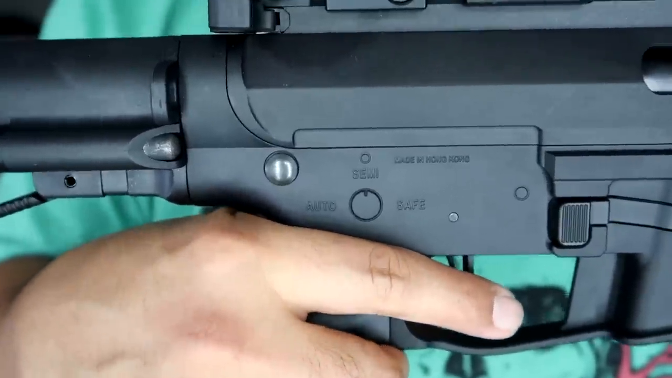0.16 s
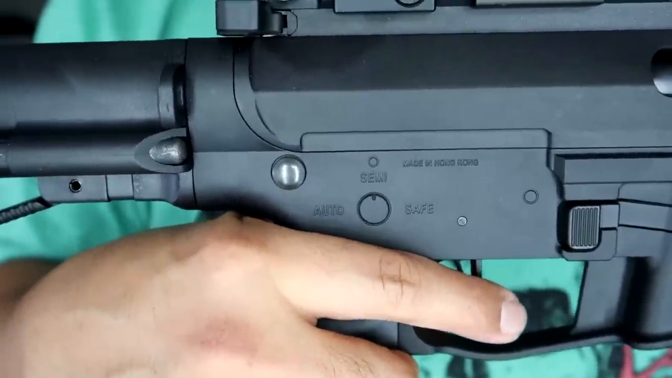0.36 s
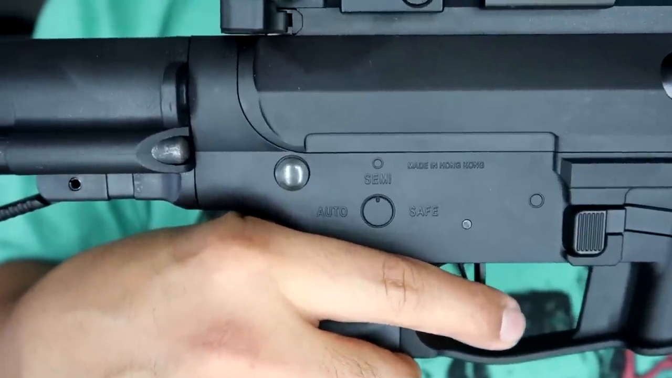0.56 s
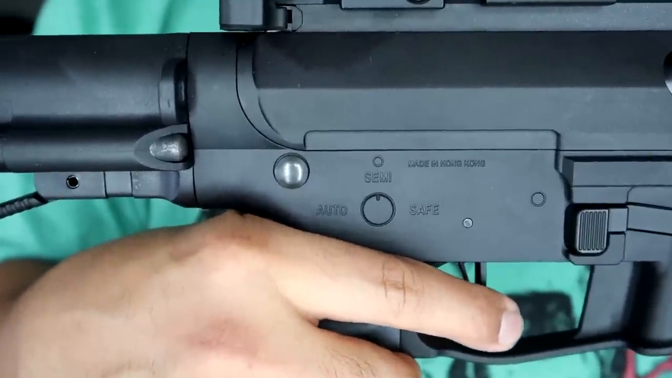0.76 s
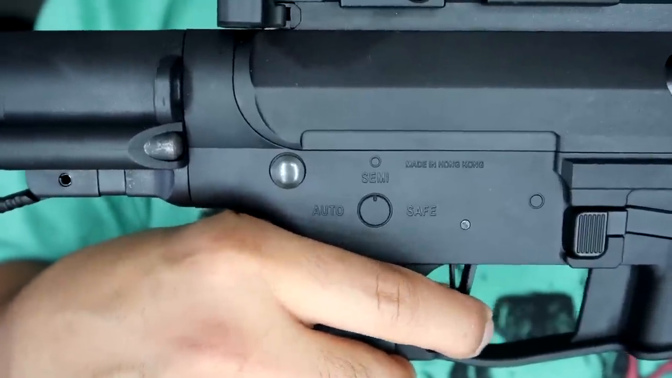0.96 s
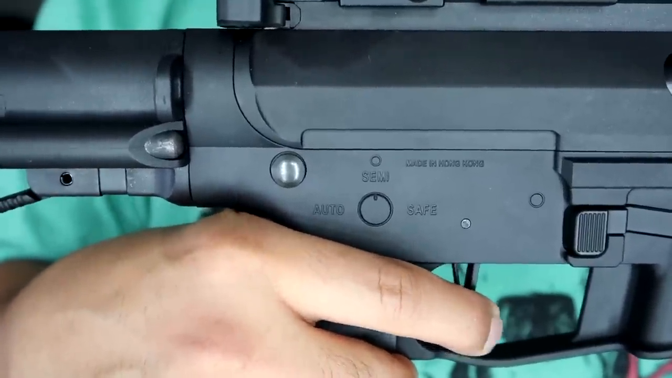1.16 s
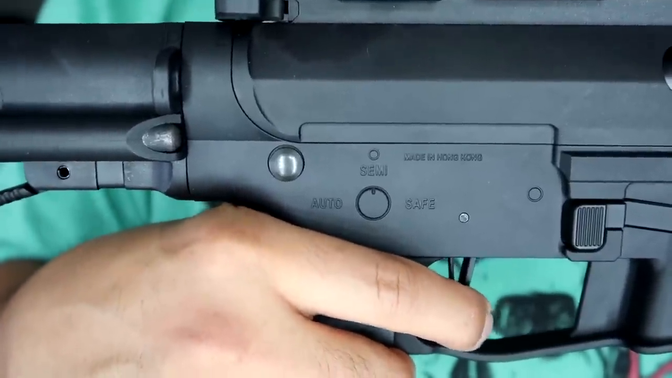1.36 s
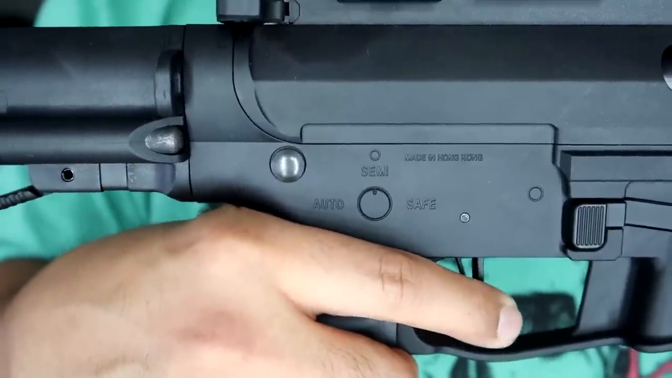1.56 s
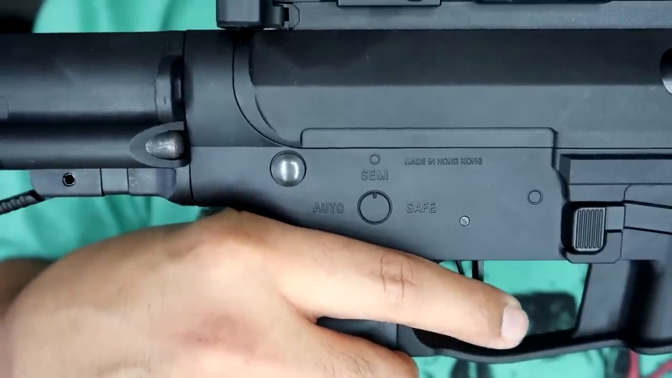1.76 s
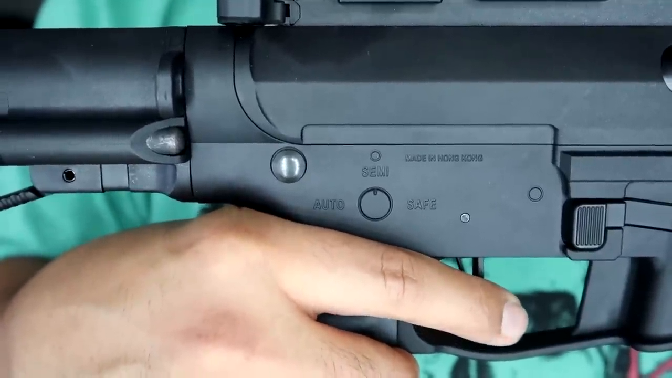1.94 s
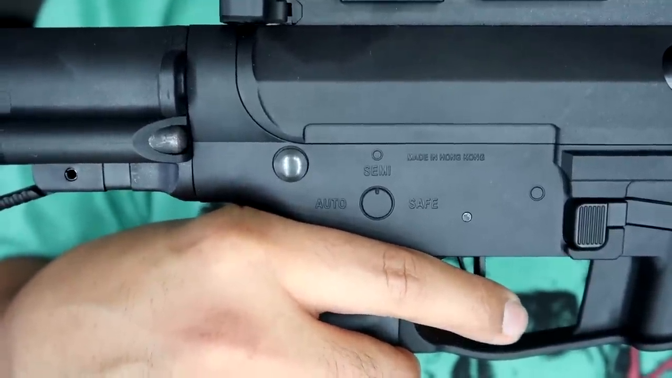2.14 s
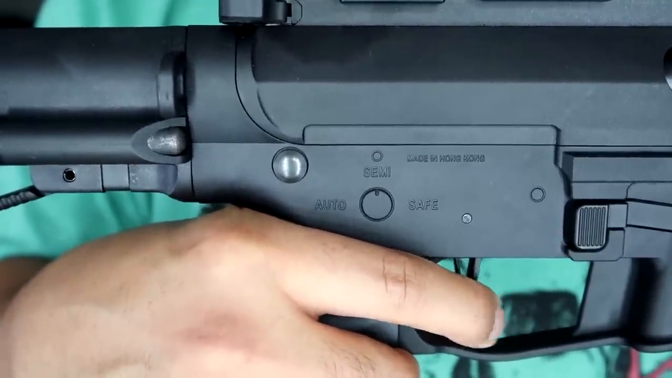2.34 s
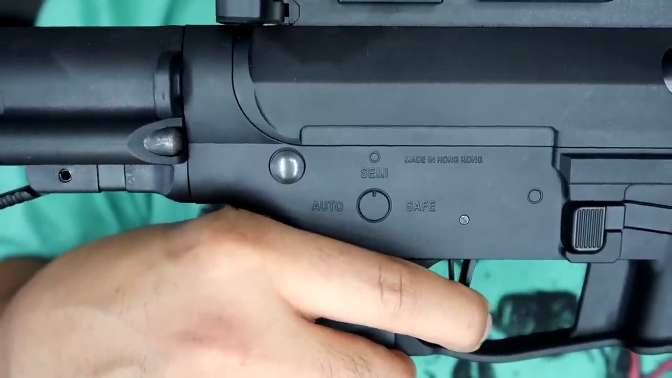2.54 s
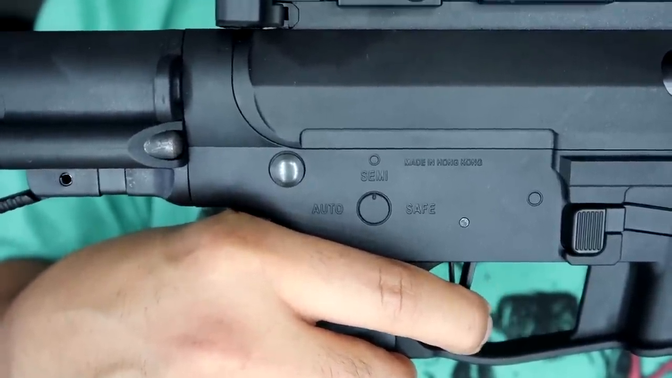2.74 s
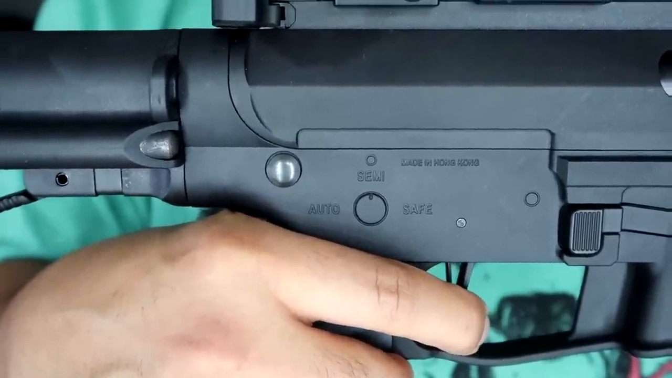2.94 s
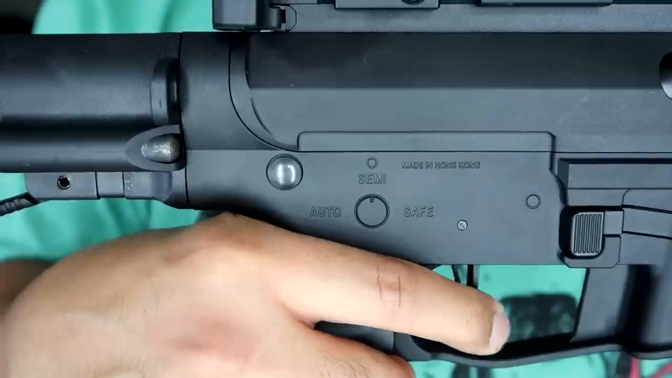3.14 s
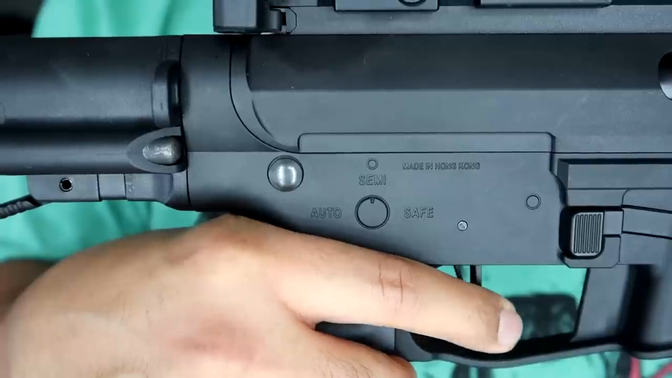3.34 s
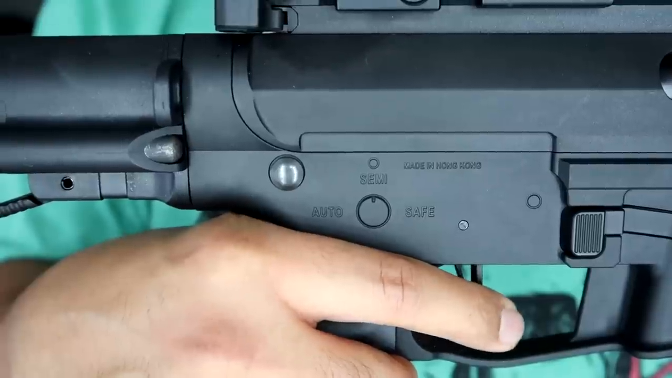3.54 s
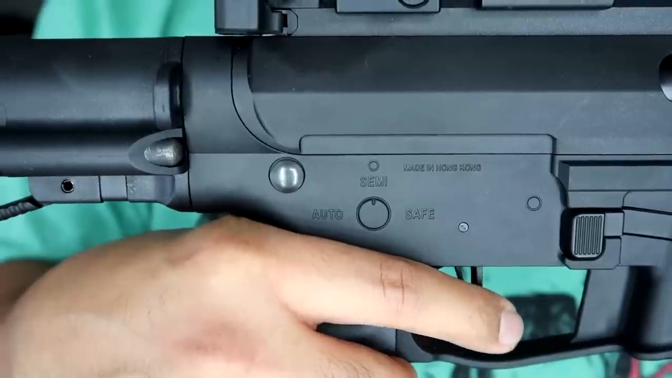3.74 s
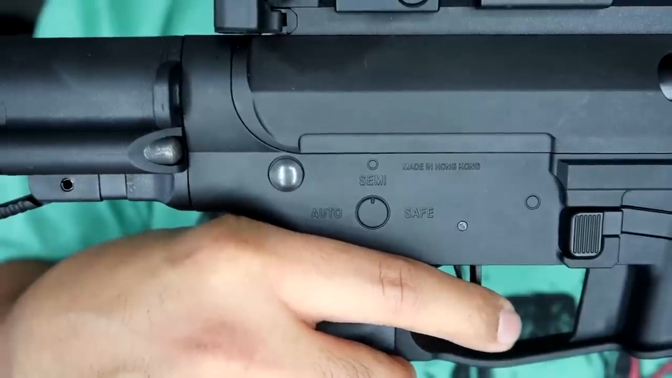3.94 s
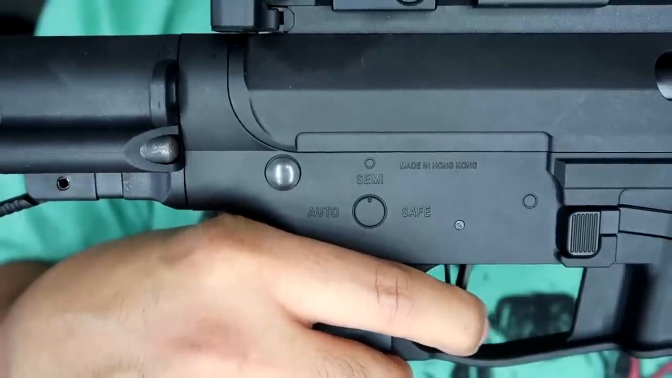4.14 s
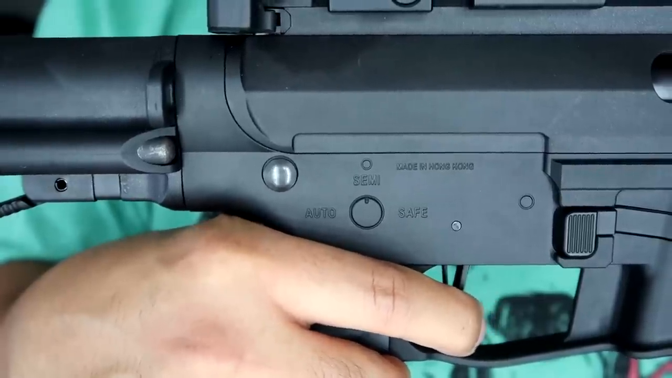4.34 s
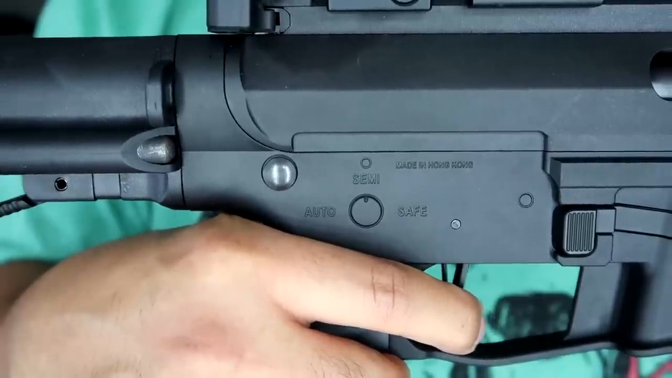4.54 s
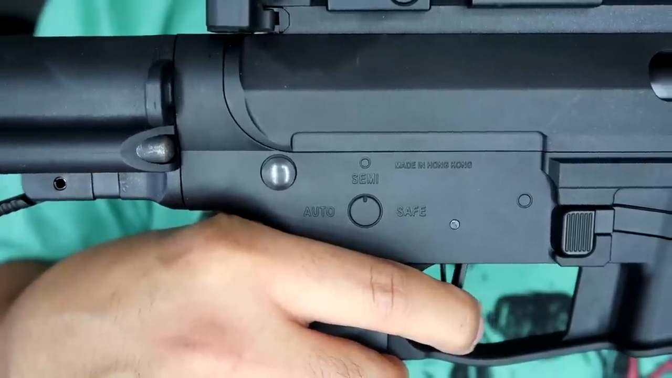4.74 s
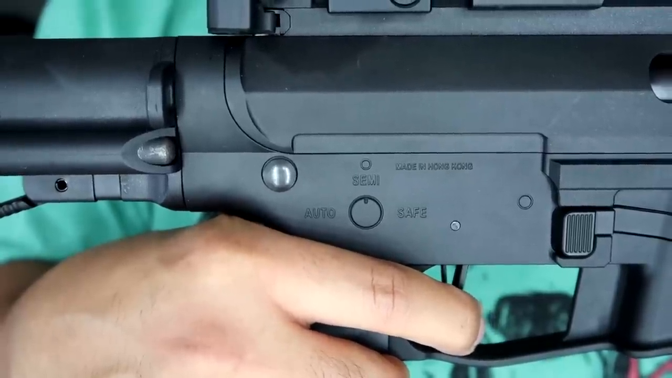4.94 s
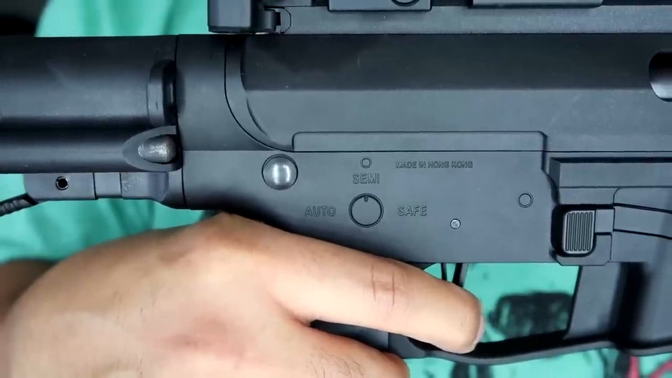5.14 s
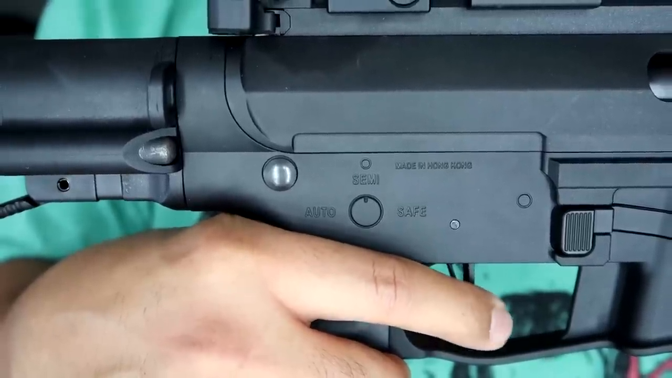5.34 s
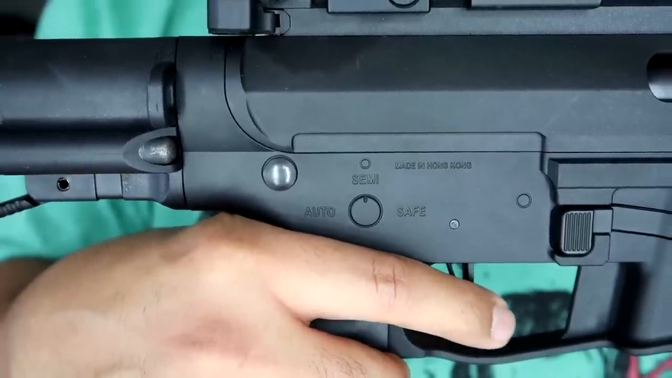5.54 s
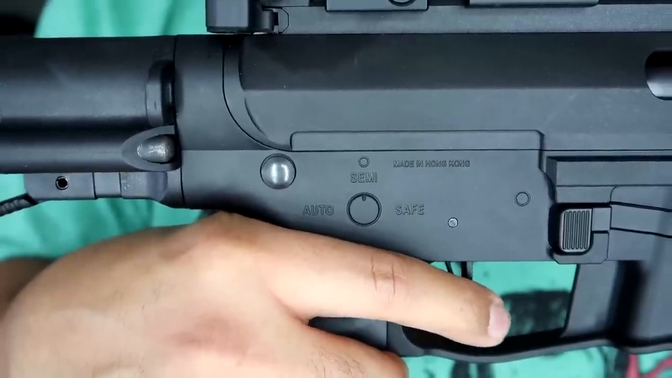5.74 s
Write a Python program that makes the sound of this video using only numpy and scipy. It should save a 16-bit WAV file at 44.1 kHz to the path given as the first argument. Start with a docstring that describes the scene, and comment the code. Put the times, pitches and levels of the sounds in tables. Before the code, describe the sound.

A small room is quiet at first, with a low wavering hum, soft rumble and hiss. At about 0.94 seconds a faint trigger tick leads straight into an electric airsoft gun's cycle, very close: a motor kick, a gritty gear whine rising for under a tenth of a second, then a hard, loud slam at 1.03. The body clacks, loose parts shiver, and a spring rings and buzzes metallically with a rapid flutter, fading over about a second. The trigger clicks back near 1.57. A second shot comes at 2.5, its spring slightly softer, with return clicks around 3.2. The third lands at 4.25 and rings a little longer, with the last clicks near 5.3. Short room echoes surround each slam. The automatic recording level drops at every shot and slowly recovers, so the hum and hiss swell back in between and at the end.

```python
"""A wavering hum, rumble and hiss fill a small room; a trigger ticks, and an electric airsoft gun fires
three single shots close by. Each time a faint hiss swells for milliseconds, the motor kicks in, and sine
whine and noise grind rise with gear speed until the piston is let go. Its slam rings the body's modes,
recoils and shivers loose parts; the spring, noise-driven resonances, rings and buzzes about a second; the
trigger clicks back. Echoes are decaying noise. The recorder's gain drops at every shot, slowly recovers."""
import sys
import numpy as np
from scipy import signal
from scipy.fft import rfft, irfft, next_fast_len
from scipy.io import wavfile
from scipy.ndimage import uniform_filter1d

SR = 44100
rng = np.random.default_rng(int(sys.argv[2]) if len(sys.argv) > 2 else 0)


def int16_out(signal):
    """Quantize to a 16-bit WAV file."""
    q = np.round(np.clip(np.atleast_2d(signal).T, -1, 1) * 32767)
    wavfile.write(sys.argv[1], SR, q.astype(np.int16))


N = 255383
TIME = np.arange(N) / SR

# room noise spectrum: (frequency [Hz], density [dB per Hz])
AIR = [(20, -4.5), (50, -2.5), (100, -2.5), (180, -6.5), (280, -3), (420, -10.5), (600, -11), (900, -13.5),
       (2000, -16), (4000, -22), (8000, -29.5), (15000, -40)]
# room noise, side over mid: (frequency [Hz], ratio [dB])
AIR_SIDE = [(60, -32.5), (110, -21.5), (200, -10), (400, -2.5), (1300, -1), (15000, -1.5)]
RUMBLE_DB, HISS_DB = -64.5, -69.5
# swells of low drone: (middle [s], level [dB], half length [s], frequency [Hz])
HUM_SWELLS = [(.28, -70, .15, 69.87), (.7, -71, 0.15, 103), (2.14, -59, .19, 87), (3.62, -60.5, .2, 86)]
HUM_HZ, HUM_DB = 94.6, -73.5
FAINT_TONE_HZ, FAINT_TONE_DB = 590, -77.5

# trigger clicks: (time [s], level [dB], centre [Hz], width [Hz])
TRIGGER = [(0.937, -71, 4040, 4500), (1.567, -54, 1630, 800), (2.4176, -64, 4015, 4500),
           (3.2000, -60.5, 5470, 1600), (3.249, -53.5, 1680, 750), (4.1510, -59.5, 3385, 4494),
           (5.2980, -61, 5480, 2504), (5.3500, -53, 1780, 810)]

# shots: (motor start [s], piston slam [s], start kick [dB], gears [dB], slam [dB])
SHOTS = [(0.9608, 1.0347, -6, -3, -1), (2.4396, 2.517, -7.5, -1.5, -0.5), (4.1729, 4.252, -11.5, -2, -1.5)]
# faint noise swell just before each motor start
LEAD_IN_S, LEAD_IN_DB = 0.0055, -41

# blows of one cycle, gear release, latch, cylinder-head hit, bounce:
# (time after slam [s], level [dB], low cutoff [Hz], high cutoff [Hz])
CYCLE = [(-0.0116, -1.5, 1607, 4600), (-0.0101, -10, 599.2, 2200), (0.0003, 7.5, 50.36, 13000),
         (0.0027, -5, 250, 1100)]
KICK_DB, KICK_LOW_HZ, KICK_HIGH_HZ = -6.5, 410, 2200
# gearbox and receiver modes: (frequency [Hz], level [dB], t60 before grip damping [s])
BODY = [(136, -29.5, 0.18), (219, -18.5, 0.088), (296, -33, 0.34), (444, -19, 0.033), (534.4, -38, 0.25),
        (673, -34, 0.38), (683, -6.5, 0.039), (915, -9, 0.0075), (880, -27.5, 0.17), (1187, -13, 0.017),
        (1280, -37, 0.3), (1400, -20.5, .025), (1920, -26.5, 0.46), (2100, -13.5, 0.0029),
        (2300, -29, 0.24), (2460, -2.5, 0.0036), (2740, -17.5, 0.004), (3294, -28, 0.021),
        (4590, -21.5, 0.0081), (4910, -27, 0.036)]
GRIP_T60_S = 0.22
# contact crack spectrum: (frequency [Hz], density [dB per Hz])
CRACK = [(200, -13), (800, 4.5), (2500, 5.5), (4000, -12.5), (7000, -9), (12500, -10), (15500, -32)]
CRACK_DB, CRACK_T60_S = -11, 0.044

# gear whine partials: (multiple of pinion tooth rate [ratio], level [dB])
WHINE = [(.29, -28), (0.581, -34.5), (1.003, -17.5), (1.621, -28), (1.83, -30.5)]
TOP_TOOTH_HZ, SPIN_UP_S = 2515, 0.025
# whine unevenness, as shares of level and of pitch
WHINE_ROUGH, WHINE_WOBBLE = 0.35, 0.015
# tooth grinding spectrum: (frequency [Hz], density [dB per Hz])
GRIND = [(100, -30.5), (330, -12), (480, -7), (620, 3.5), (950, -0.5), (1350, 2.5), (1650, -9), (2200, 3),
         (2800, -1.5), (3900, -5), (5500, -11), (7500, -14.5), (10000, -19.5), (13000, -23), (15500, -33)]
GRIND_DB, GEARS_LOW_HZ = -20.5, 430
# gear housing rung by the teeth: (frequency [Hz], width [Hz], level [dB])
HOUSING = [(667, 62, 2.5), (996, 83, -5), (1348, 8.7, -0.5), (1950, 64, 1), (2100, 60, 4), (2290, 39, 1),
           (3390, 59, -1), (3610, 34, -4), (3720, 130, -2.5), (3960, 120, -3), (4212, 43, -2),
           (4430, 47, -5.5)]
HOUSING_DB = -21.5

# loose parts' shiver spectrum: (frequency [Hz], density [dB per Hz])
SHIVER = [(120, -15), (215, 4.5), (300, -10.5), (480, -8.5), (760, 3.5), (1100, -4), (1600, -4.5),
          (2300, 0.5), (4000, -6.5), (6000, -10.5), (8500, -18.5), (11000, -37.5)]
SHIVER_DB, SHIVER_T60_S = -20.5, 0.22  # level against the slam

# spring swing per shot: (knocks [per s], timing scatter [periods], extra level of main buzz [dB])
SWING = [(94.3, .05, 4), (93, .2, -1.5), (94, .2, -1.5)]
# spring per shot: (ring [dB], buzz [dB], scrape [dB], loss [dB per s], fade-out start [s], beat depth [dB])
SPRING_RUNS = [(-49.5, -52.5, -59, 16.5, .84, 3), (-53, -57.5, -67, 18, .97, 1.5),
               (-52.5, -57, -69.5, 15, 1.22, 1)]
# spring ring resonances: (frequency [Hz], width [Hz], level [dB])
SPRING_RING = [(563, 23, 1), (825, 46, -3.5), (1252, 86, 0), (1470, 140, -18.5), (1970, 110, -8.5),
               (2450, 90, -9)]
# higher buzzing resonances: (frequency [Hz], width [Hz], level [dB])
SPRING_BUZZ = [(2720, 180, -1.5), (3334, 180, 2), (4090, 100, 2), (4920, 190, -13.5), (5300, 160, -14),
               (5950, 300, -13.5), (6700, 560, -14), (8500, 1000, -13)]
# bright scrape of the knocks: (frequency [Hz], density [dB per Hz])
SCRAPE = [(2000, -24.5), (3300, -2), (5000, 0), (7000, -3), (8500, -7.5), (12000, -28)]
# coils rubbing on the guide: (frequency [Hz], density [dB per Hz])
RUB = [(200, -9.5), (600, 0.5), (1500, -2.5), (4000, -8), (8000, -16.5), (12000, -31.5)]
RUB_DB = -5.5  # against the ring
BEAT_HZ, RING_BEAT_SHARE = 3.6, 0.25

# gun at the microphone ports, side over mid: (frequency [Hz], ratio [dB])
GUN_SIDE = [(60, -30.5), (200, -33.5), (700, -26), (1300, -22.5), (2400, -17.5), (4400, -8), (6000, 0.5),
            (8100, 8.5), (9500, 20), (15000, 24.5)]
# room echo colour: (frequency [Hz], level [dB])
ROOM = [(60, -13), (130, -10), (220, 0.5), (330, 0), (500, -4.5), (850, -2), (1250, -1.5), (1650, -3.5),
        (2200, -6.5), (4000, -2), (8000, -1), (15000, -3)]
# room echo, side over mid: (frequency [Hz], ratio [dB])
ROOM_SIDE = [(60, -21.5), (200, -28.5), (400, -21.5), (700, -24), (1300, -17), (2400, -10.5), (4400, -6),
             (8100, 1.5), (9500, 20.5), (15000, 28)]
# late echo decay: (band centre [Hz], t60 [s])
ROOM_T60 = [(100, 0.075), (400, 0.36), (1200, .35), (3000, 0.29), (7000, 0.16), (14000, 0.25)]
EARLY_DB, EARLY_T60_S, LATE_DB = -8.5, 0.14, -7.5

# gain control
AIM_DB, MOST_GAIN_DB, RECOVERY_DB_PER_S = -13, 14.5, 8
DETECTOR_S, GAIN_ATTACK_S = 0.014, 0.0086
STOPBAND_HZ = 16300


def from_db(db):
    """Amplitude ratio of a level in dB."""
    return 10 ** (np.asarray(db) / 20)


def rms_one(x):
    """Scale to rms 1."""
    return x / np.sqrt(np.mean(x ** 2) + 1e-20)


def at_hz(points, hz):
    """Interpolate a spectrum on a log-frequency axis."""
    f, value = np.transpose(points)
    return np.interp(np.log(hz + 1e-9), np.log(f), value)


def bins(count):
    """Real-FFT bin frequencies in Hz."""
    return np.arange(count // 2 + 1) * SR / count


def noise(spectrum, count):
    """Coloured noise, rms 1."""
    white = rfft(rng.standard_normal(count))
    return rms_one(irfft(white * from_db(at_hz(spectrum, bins(count))), count))


def stereo_noise(spectrum, side_db, count):
    """Coloured stereo noise with a set side/mid ratio at each frequency, rms 1."""
    size = next_fast_len(count)
    mid, side = rfft(rng.standard_normal((2, size)))
    share = from_db(at_hz(side_db, bins(size)))
    pair = (mid + share * side * [[1], [-1]]) / np.hypot(1, share)
    colour = from_db(at_hz(spectrum, bins(size)))
    return rms_one(irfft(pair * colour, size)[:, :count])


def drift(knots_per_s):
    """Random values of spread 1, joined by straight lines."""
    knots = rng.standard_normal(4096)
    return np.interp(TIME * knots_per_s, np.arange(len(knots)), knots)


def cut(x, hz, kind, order=2):
    """Butterworth filter."""
    sos = signal.butter(order, np.clip(hz, 10, 0.45 * SR), kind, fs=SR, output="sos")
    return signal.sosfilt(sos, x + 1e-18)


def resonate(x, resonances):
    """Parallel two-pole resonances of alternating sign."""
    out = 0
    for k, (hz, width_hz, db) in enumerate(resonances):
        r = np.exp(-np.pi * width_hz / SR)
        gain = (-1) ** k * from_db(db) * (1 - r * r) / 2
        poles = [1, -2 * r * np.cos(2 * np.pi * hz / SR), r * r]
        out = out + gain * signal.lfilter([1, 0, -1], poles, x + 1e-18)
    return out


def decay(t, t60_s):
    """Exponential fall of 60 dB in t60_s."""
    return np.exp(-np.log(1000) * t / t60_s)


def add(out, at_s, sound):
    """Mix a sound in at a time."""
    at = int(round(at_s * SR))
    out[at:at + len(sound)] += sound[:N - at]


def background(split_hz=500, hum_waver=0.024, hum_flutter_db=4.5, tone_flutter_db=2.5, tone_waver_rad=1.6):
    """Steady rumble and hiss, a wavering hum with a few low swells, a faint fluttering tone."""
    air = stereo_noise(AIR, AIR_SIDE, N)
    low = cut(air, split_hz, "low", order=1)
    air = from_db(RUMBLE_DB) * low + from_db(HISS_DB) * (air - low)

    turn = 2 * np.pi * np.cumsum(1 + hum_waver * drift(32)) / SR  # phase of 1 Hz
    hum = from_db(HUM_DB + hum_flutter_db * drift(13)) * np.sin(HUM_HZ * turn)
    for middle_s, db, half_s, hz in HUM_SWELLS:
        swell = from_db(db) / (1 + ((TIME - middle_s) / half_s) ** 2)
        hum += swell * np.sin(hz * turn)

    tone_level = from_db(FAINT_TONE_DB + tone_flutter_db * drift(23))
    tone_phase = 2 * np.pi * FAINT_TONE_HZ * TIME + tone_waver_rad * drift(42)
    return air + np.sqrt(2) * (hum + tone_level * np.sin(tone_phase))


def trigger(t60_s=0.0072):
    """Small dry ticks of the trigger pressed and let go: decaying noise through a double resonance."""
    out, t = np.zeros(N), TIME[:SR // 16]
    for at_s, db, hz, width_hz in TRIGGER:
        tick = rng.standard_normal(len(t)) * decay(t, t60_s)
        for _ in range(2):
            tick = resonate(tick, [(hz, width_hz, 0)])
        add(out, at_s, from_db(db) * tick / np.std(tick[:SR // 250]))
    return out


def lead_in():
    """A faint swell of gear-coloured noise that leads into each motor start."""
    out, count = np.zeros(N), int(LEAD_IN_S * SR)
    for start_s, *_ in SHOTS:
        swell = noise(GRIND, SR // 10)[:count] * np.sqrt(np.linspace(0, 2, count))
        add(out, start_s - LEAD_IN_S, from_db(LEAD_IN_DB) * swell)
    return out


def body_ring():
    """The gun's answer to one blow: modes damped by the shooter's grip, plus a short crack."""
    t = TIME[:SR // 2]
    modes = np.zeros(len(t))
    for k, (hz, db, t60_s) in enumerate(BODY):
        modes += (-1) ** k * from_db(db) * np.sin(2 * np.pi * hz * t) * decay(t, t60_s)
    crack = from_db(CRACK_DB) * noise(CRACK, len(t)) * decay(t, CRACK_T60_S)
    return modes * decay(t, GRIP_T60_S) + crack


def blows():
    """Every knock rings the same body; the contact decides which band it reaches."""
    knocks = []
    for start_s, slam_s, kick_db, _, slam_db in SHOTS:
        knocks.append((start_s, KICK_DB + kick_db, KICK_LOW_HZ, KICK_HIGH_HZ))
        knocks += [(slam_s + lag_s, slam_db + db, low, high) for lag_s, db, low, high in CYCLE]
    out, ring = np.zeros(N), body_ring()
    for at_s, db, low_hz, high_hz in knocks:
        add(out, at_s, from_db(db) * cut(cut(ring, low_hz, "high"), high_hz, "low"))
    return out


def gears(tooth_depth=0.85, rattle_db=0.0, bright_hz=1700, brighten_s=0.013, dull_fall=0.86, run_down_s=0.007):
    """The motor spins up; teeth whine and grind, ever brighter, until the piston is let go."""
    out, t = np.zeros(N), TIME[:SR // 6]
    speed = 1 - np.exp(-t / SPIN_UP_S)
    bright = 1 - np.exp(-t / brighten_s)
    for start_s, slam_s, _, gears_db, _ in SHOTS:
        tooth_hz = TOP_TOOTH_HZ * speed * (1 + WHINE_WOBBLE * drift(250)[:len(t)])
        turn = 2 * np.pi * np.cumsum(tooth_hz) / SR
        whine = np.zeros(len(t))
        for multiple, db in WHINE:
            rough = 1 + WHINE_ROUGH * drift(300)[:len(t)]
            whine += from_db(db) * np.sqrt(2) * np.sin(multiple * turn) * rough

        # one pulse per tooth of the slow gear; rattle_db 0 keeps them even
        pulses = (1 + tooth_depth * np.cos(WHINE[0][0] * turn)) * from_db(rattle_db * drift(500)[:len(t)])
        housing = rms_one(resonate(pulses * rng.standard_normal(len(t)), HOUSING))
        grind = from_db(GRIND_DB) * noise(GRIND, len(t)) * pulses + from_db(HOUSING_DB) * housing
        dull = cut(grind, bright_hz, "low", order=1)

        sound = speed ** 3 * whine + bright * (grind - dull) + (1 - dull_fall * speed) * dull
        release_s = slam_s + CYCLE[0][0]
        loaded = np.exp(-np.maximum(start_s + t - release_s, 0) / run_down_s)
        sound = cut(cut(loaded * sound, GEARS_LOW_HZ, "high"), GEARS_LOW_HZ, "high")
        add(out, start_s, from_db(gears_db) * sound)
    return out


def recoil(lead_s=0.0018, width_s=0.00076, push_db=-18):
    """The piston's rush shoves gun and air one way, then back: a single low swing."""
    out = np.zeros(N)
    for _, slam_s, _, _, slam_db in SHOTS:
        u = np.clip((TIME - slam_s + lead_s) / width_s, -10, 10)
        out += from_db(push_db + slam_db) * u * np.exp((1 - u * u) / 2)
    return out


def shiver():
    """Loose small parts chatter densely after each slam: decaying coloured noise."""
    out, t = np.zeros(N), TIME[:SR // 2]
    for _, slam_s, _, _, slam_db in SHOTS:
        chatter = noise(SHIVER, len(t)) * decay(t, SHIVER_T60_S)
        add(out, slam_s, from_db(SHIVER_DB + slam_db) * chatter)
    return out


def spring(uneven_db=3.35, knock_t60_s=0.012, sizzle=0.084, ring_sizzle=0.5, fade_s=0.075):
    """Coils knock on the guide once a swing and drive the resonances; the swing beats and dies down."""
    out = np.zeros(N)
    for shot, run, (knocks_per_s, scatter, main_db) in zip(SHOTS, SPRING_RUNS, SWING):
        ring_db, buzz_db, scrape_db, loss_db_per_s, length_s, beat_db = run
        start_s = shot[1]
        age = np.maximum(TIME - start_s, 0)

        chance = rng.standard_normal((160, 2))  # knock timing, knock level
        times = start_s + np.abs(np.arange(len(chance)) + scatter * chance[:, 0]) / knocks_per_s
        knocks = np.zeros(2 * N)  # room for knocks past the end
        knocks[(times * SR).astype(int)] = from_db(uneven_db * np.minimum(chance[:, 1], 1.5))
        contact = signal.lfilter([1], [1, -decay(1 / SR, knock_t60_s)], knocks[:N] + 1e-18)

        sounding = (age > 0) & (age < length_s)
        fade = np.exp(-np.maximum(age - length_s, 0) / fade_s)
        swing = (age > 0) * from_db(-loss_db_per_s * age) * fade
        # two close swings beat
        beat = beat_db * np.cos(2 * np.pi * BEAT_HZ * age)

        buzz_modes = [(hz, width, db + main_db * (k == 1)) for k, (hz, width, db) in enumerate(SPRING_BUZZ)]
        ring = resonate((contact + ring_sizzle) * rng.standard_normal(N), SPRING_RING)
        buzz = resonate((contact + sizzle) * rng.standard_normal(N), buzz_modes)
        scrape = (contact + sizzle) * noise(SCRAPE, next_fast_len(N))[:N]
        rub = noise(RUB, next_fast_len(N))[:N]
        layers = [(ring, ring_db + RING_BEAT_SHARE * beat), (buzz, buzz_db + beat),
                  (scrape, scrape_db + beat), (rub, ring_db + RUB_DB)]
        for sound, db in layers:
            out += from_db(db) * swing * sound / np.std(sound[sounding])
    return out


def ports(x, ripple=0.19, ripple_hz=300, shadow_hz=3500):
    """Two microphone ports hear the gun alike in the bass, in near-opposite phase in the treble."""
    size = next_fast_len(N + SR // 10)
    hz = bins(size)
    half_phase = np.arctan(from_db(at_hz(GUN_SIDE, hz)))
    # short waves scatter round the microphone's case, differently for each port
    chance = np.interp(hz / ripple_hz, np.arange(256), rng.standard_normal(256))
    scatter = ripple * hz / (hz + shadow_hz) * np.sin(2 * half_phase) * chance
    pair = np.exp((2 * scatter + 1j * half_phase) * [[-1], [1]])
    pair = pair / np.sqrt(np.cosh(4 * scatter))  # keeps the pair's power
    return irfft(rfft(x, size) * pair, size)[:, :N]


def room(x, first_echo_s=0.0049):
    """Quick reflections from the shooter and nearby things, then a tail that dies band by band."""
    def unit_energy(t60_s):
        return np.sqrt(np.log(1e6) / (t60_s * SR))

    t = TIME[:SR * 2 // 3]
    early = stereo_noise(ROOM, ROOM_SIDE, len(t)) * decay(t, EARLY_T60_S) * unit_energy(EARLY_T60_S)
    wash, late = rfft(stereo_noise(ROOM, ROOM_SIDE, len(t))), 0
    centres = [hz for hz, _ in ROOM_T60]
    # overlapping bands, each with weight 1 at its own centre
    for weights, (_, t60_s) in zip(np.eye(len(centres)), ROOM_T60):
        share = at_hz(list(zip(centres, weights)), bins(len(t)))
        band = irfft(wash * share, len(t))
        late = late + band * decay(t, t60_s) * unit_energy(t60_s)
    echo = (from_db(EARLY_DB) * early + from_db(LATE_DB) * late) * (t > first_echo_s)
    return signal.fftconvolve(x[None], echo, axes=1)[:, :N]


def gain_control(x):
    """Loud sound pushes the gain down fast; it creeps back, and the room noise rises with it."""
    power = uniform_filter1d(np.mean(x ** 2, axis=0), int(DETECTOR_S * SR))
    level_db = 10 * np.log10(np.maximum(power, 1e-12))
    excess_db = np.maximum(level_db + MOST_GAIN_DB - AIM_DB, 0)
    # peak hold, falling at the recovery rate
    climb_db = RECOVERY_DB_PER_S * TIME
    duck_db = np.maximum.accumulate(excess_db + climb_db) - climb_db
    r = np.exp(-1 / (GAIN_ATTACK_S * SR))
    return x * from_db(MOST_GAIN_DB - signal.lfilter([1 - r], [1, -r], duck_db))


def scene():
    """The gun, its room and the background."""
    gun = lead_in() + blows() + shiver() + recoil() + gears() + spring() + trigger()
    return ports(gun) + room(gun) + background()


def record(dry):
    """The gain rides the shots, peaks are rounded off, the top is cut."""
    held = gain_control(dry)
    rounded = held / (1 + held ** 6) ** (1 / 6)
    low_pass = signal.cheby2(14, 70, STOPBAND_HZ, fs=SR, output="sos")
    return signal.sosfilt(low_pass, rounded)


dry = scene()
out = record(dry)
int16_out(out)
```